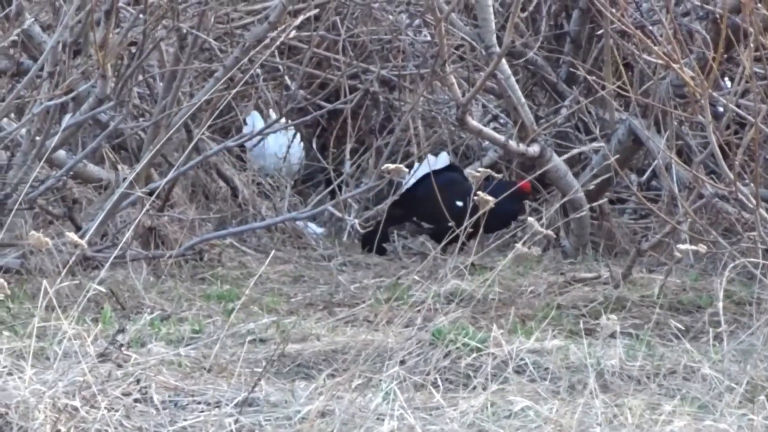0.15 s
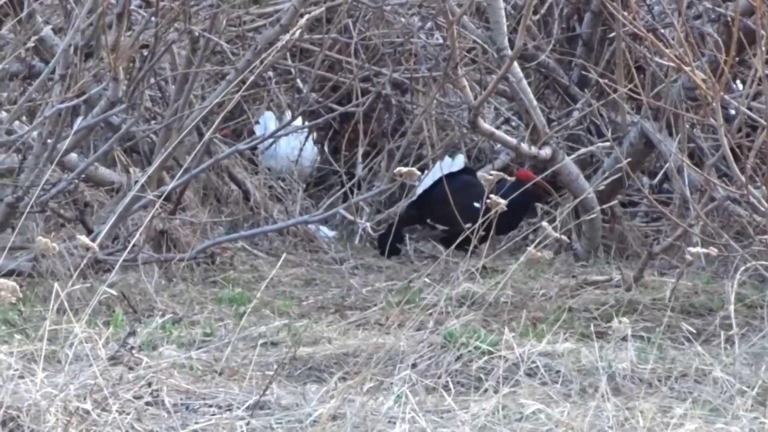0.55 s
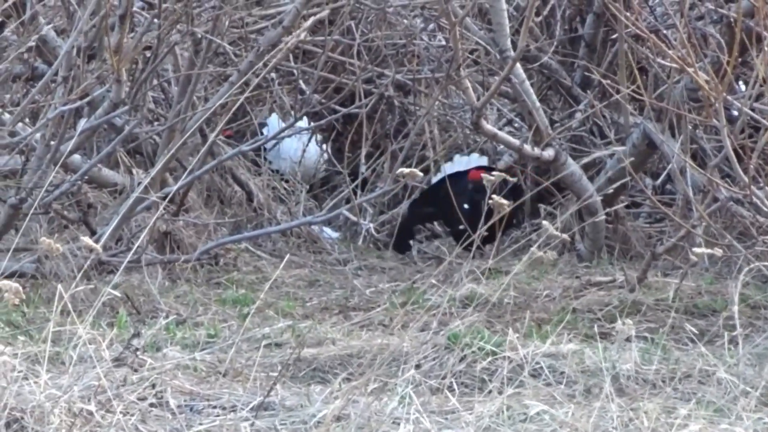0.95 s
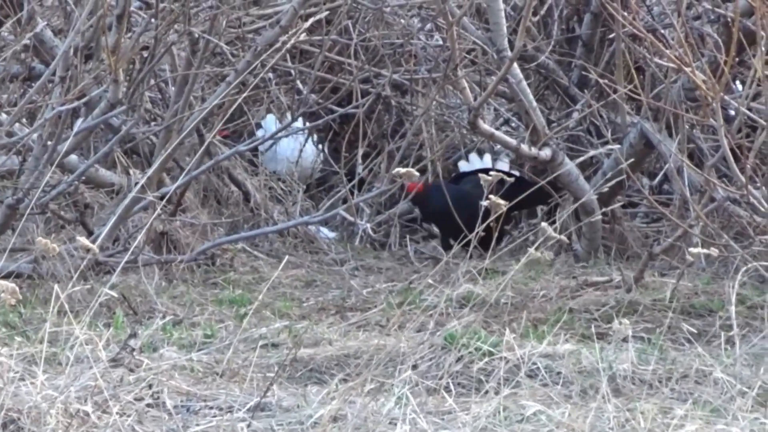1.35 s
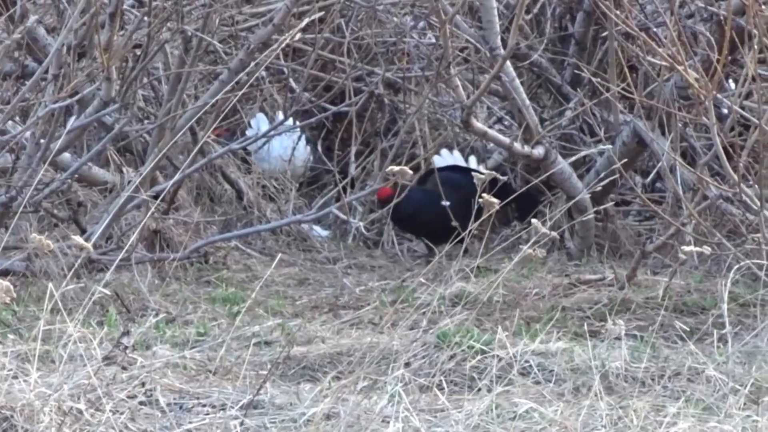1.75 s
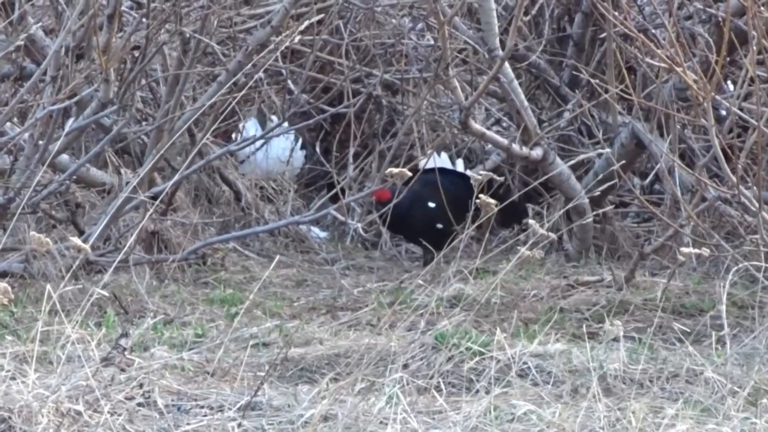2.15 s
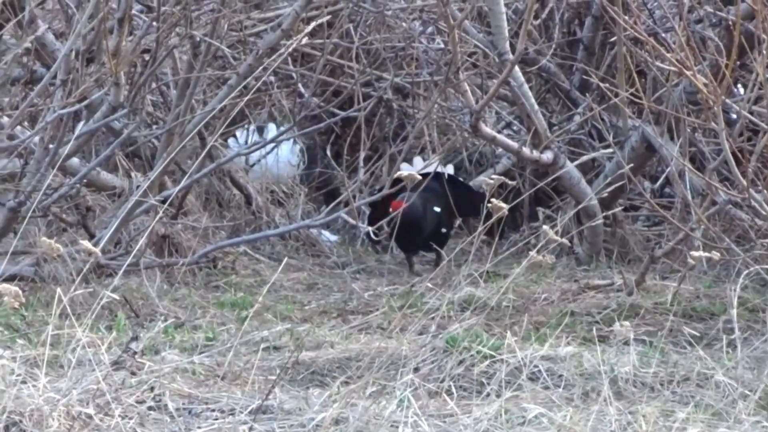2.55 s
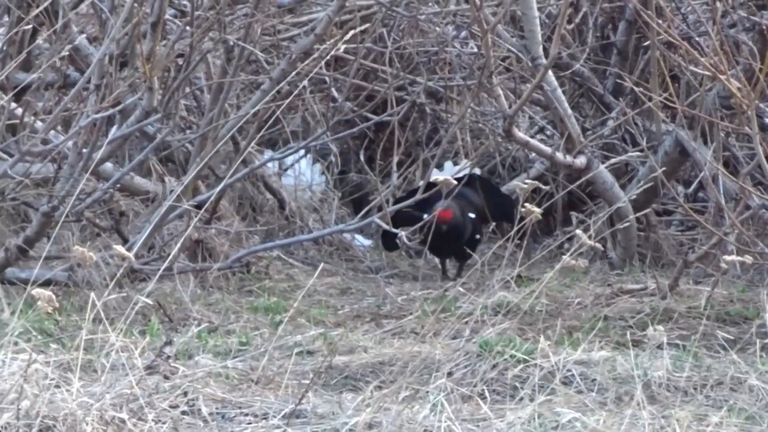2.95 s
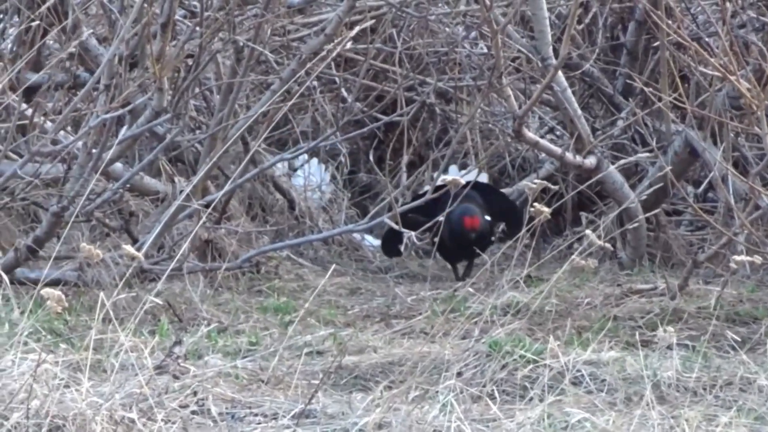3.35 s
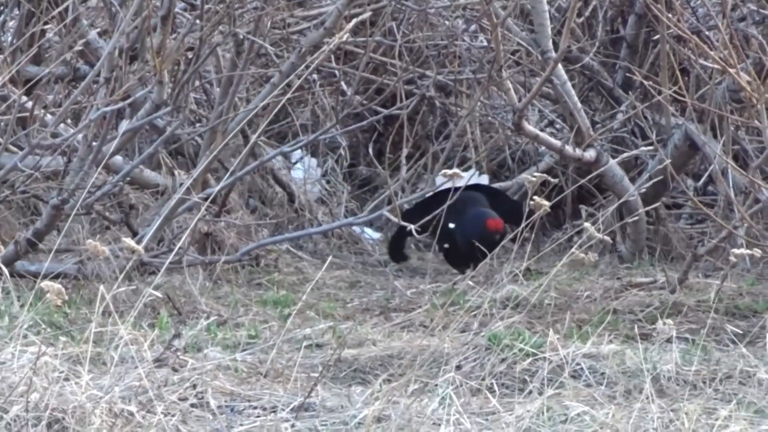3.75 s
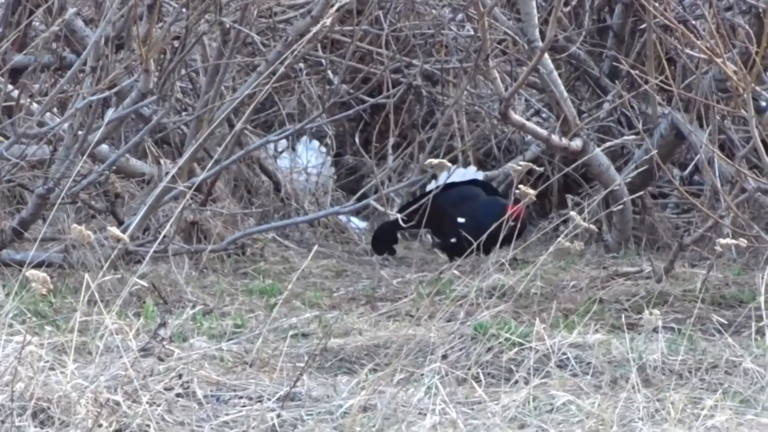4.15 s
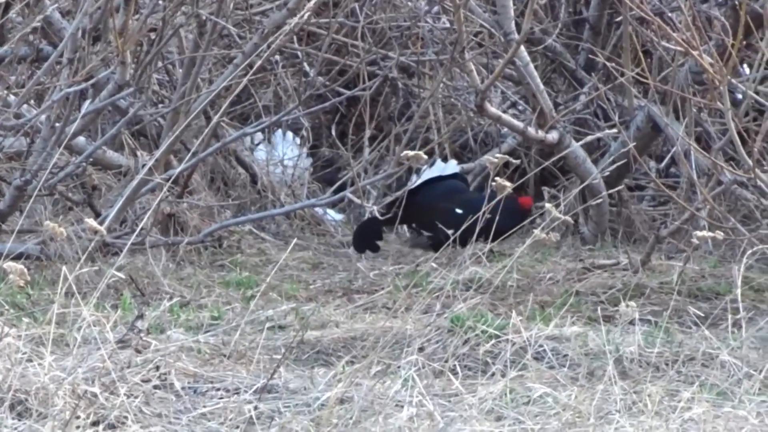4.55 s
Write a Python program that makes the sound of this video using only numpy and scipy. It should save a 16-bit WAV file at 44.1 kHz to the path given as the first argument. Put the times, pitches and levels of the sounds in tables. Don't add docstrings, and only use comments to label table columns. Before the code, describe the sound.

Uneven wind thumps and deep jolts underlie a soft bubbling grouse song, quick songbird warbling, sagging whistles and faint distant chirps.

```python
import sys
import numpy as np
from scipy import signal
from scipy.fft import rfft, irfft, next_fast_len
from scipy.io import wavfile
from scipy.ndimage import map_coordinates

SR = 44100
rng = np.random.default_rng(int(sys.argv[2]) if len(sys.argv) > 2 else 0)


def wav_out(sig):
    wavfile.write(sys.argv[1], SR, np.round(np.clip(np.atleast_2d(sig).T, -1, 1) * 32767).astype(np.int16))


def elevation(decibels):
    levels = np.asarray(decibels, float)
    return 10 ** (levels / 20)


N = 207925

# centre_s, peak_db, pitch_hz, half_length_ms
OPENING_BUBBLES = [(.764, -40.5, 396, 9.9), (.844, -32.5, 418, 5.4), (.919, -31, 420, 8.4),
                   (.969, -37, 389, 10), (.998, -27.5, 437, 8.5), (1.051, -33.5, 388, 11),
                   (1.065, -33, 464, 14), (1.083, -20.5, 443, 4.7), (1.128, -33, 402, 10),
                   (1.138, -33.5, 487, 13), (1.168, -21, 457, 5), (1.22, -26, 452.3, 9.1),
                   (1.24, -30.5, 490, 10)]
# centre_s, peak_db, pitch_hz, half_length_ms
ROLLING_BUBBLES = [(1.548, -31, 503, 5.7), (1.575, -33, 498, 17), (1.585, -23.5, 460, 6.2),
                   (1.66, -27.5, 505, 5.9), (1.69, -26.5, 475, 12.3), (1.755, -36.5, 450, 12),
                   (1.805, -36, 481, 19), (1.821, -29.5, 459, 17), (1.853, -32.5, 432, 7),
                   (1.894, -23.5, 430, 5.6), (1.942, -27.5, 422, 10.7), (1.976, -30, 400, 10),
                   (1.996, -29, 492, 16.3), (2.084, -35.5, 475, 18), (2.101, -22, 437, 5.5)]
# centre_s, peak_db, pitch_hz, half_length_ms
CLOSING_BUBBLES = [(2.22, -29, 438, 13), (2.257, -29, 490, 7.5), (2.27, -28.5, 431, 7.2),
                   (2.294, -28, 422, 10.4), (2.327, -31.5, 452, 21), (2.41, -30.5, 475, 8.9),
                   (2.465, -28.5, 460, 4.3), (2.49, -30, 462, 16), (2.499, -28.5, 517, 11),
                   (2.533, -32, 438, 17), (2.548, -24.5, 488, 11.5), (2.588, -31, 471, 23),
                   (2.605, -27.5, 440, 9.5), (2.654, -34, 460, 4.1), (2.68, -20.5, 442, 8.4),
                   (2.744, -37, 462, 13), (2.894, -30.5, 432, 5)]
# time_s, peak_db, pitch_hz
MUTTER = [
    (.5, -46, 390),
    (.75, -43.5, 387),
    (1.0, -43, 427),
    (1.35, -42.5, 470),
    (1.6, -40.5, 437),
    (2.1, -38, 450),
    (2.6, -40, 470),
    (2.9, -40, 447),
    (3.05, -48, 430),
]

# start_s, length_ms, start_hz, end_hz, peak_db
WARBLE_FALLS = [(1.332, 42, 3160, 3280, -53), (1.395, 24.4, 3780, 3400, -45.5),
                (1.703, 13, 3940, 2900, -49), (1.729, 32.3, 4720, 2650, -33.5),
                (1.846, 21, 3500, 2980, -45), (1.889, 11, 4380, 3830, -35), (1.897, 23, 3846, 3420, -31.5),
                (1.920, 39, 3130, 2654, -38), (1.960, 38.7, 4300, 2376, -35.5),
                (2.064, 25, 4160, 3080, -41.5), (2.086, 24.3, 4230, 3387, -31),
                (2.108, 12, 3320, 2870, -38), (2.216, 23, 3790, 3010, -40), (2.266, 18, 4480, 3840, -32.5),
                (2.280, 18.5, 4210, 3020, -34), (2.344, 23, 4200, 2840, -35),
                (2.419, 16.4, 4384, 3750, -35.5), (2.448, 12.2, 3530, 2990, -37.5),
                (2.458, 17, 3040, 2930, -41.5)]
# start_s, start_hz, end_hz, peak_db
WARBLE_FLICKS = [
    (1.385, 3330, 4300, -49),
    (1.883, 3400, 4300, -40),
    (1.952, 3100, 3770, -41),
    (1.985, 2940, 3600, -42),
    (2.237, 3770, 4270, -39),
    (2.252, 3060, 4600, -37),
    (2.299, 3460, 4030, -35),
    (2.478, 3430, 3760, -40),
]
# start_s, pitch_hz, peak_db
WARBLE_PIPS = [(1.718, 4460, -35.5), (1.835, 3950, -48), (1.868, 4110, -41), (2.039, 3320, -45),
               (2.195, 3950, -47), (2.205, 3220, -49), (2.305, 2840, -40), (2.325, 4050, -31),
               (2.368, 3870, -51), (2.432, 3656, -33.5), (2.55, 3080, -49)]
# start_s, length_ms, start_hz, peak_db
SAGGING_WHISTLES = [(2.806, 40, 3806, -32.5), (2.924, 43, 3683, -32), (2.935, 40, 3980, -45),
                    (2.992, 55, 3595, -36), (3.140, 52, 3570, -36), (3.2, 81, 3616, -43.5),
                    (3.222, 50, 3260, -39), (3.3, 64, 3240, -53), (3.440, 51, 3290, -37),
                    (3.591, 27, 3345, -43), (3.61, 35, 3660, -52.5), (3.760, 20, 3870, -57)]
# start_s, length_ms, pitch_hz, peak_db
LEVEL_WHISTLES = [(1.160, 49, 4100, -54.5), (1.432, 21, 4000, -48.5), (1.52, 80, 3920, -63),
                  (1.55, 43, 3420, -60), (2.520, 170, 3610, -52.5), (2.515, 20, 3320, -45),
                  (2.600, 110, 3140, -49.5), (2.675, 44, 5040, -55), (2.720, 55, 3720, -63),
                  (2.862, 30, 3750, -57), (3.010, 20, 3890, -43), (3.082, 36, 3593, -31.5),
                  (3.352, 41, 3420, -40), (3.404, 22, 3830, -37), (3.340, 57, 3840, -46),
                  (3.42, 82, 3410, -47.5), (3.440, 150, 3790, -50), (3.520, 33, 3340, -43.5),
                  (3.605, 44, 3106, -44), (3.735, 22, 3315, -52.5)]
# pitch_hz, gain_db
BEAK = [(2400, -6), (3000, -5), (3600, 0), (4200, -1), (5000, -6)]
# delay_ms, gain_db
BRANCHES = [
    (2.1, -9),
    (4.7, -8),
    (8.3, -9),
]
# start_s, length_ms, start_hz, end_hz, peak_db
BUZZ = [
    (2.975, 20, 3770, 4280, -48),
    (3.03, 53, 4230, 3800, -50),
    (3.122, 43, 3930, 4230, -53),
    (3.495, 17, 4160, 4050, -51),
    (3.53, 53, 4220, 3920, -55),
]
# start_s, length_ms, start_hz, end_hz, peak_db
FAR_BIRDS = [(.175, 107, 3490, 2865, -56.5), (.310, 24, 3100, 3110, -56.5), (.420, 85, 3260, 2870, -63),
             (.580, 16, 2800, 2600, -58), (.697, 16, 3040, 3150, -53), (.714, 14, 3060, 2350, -59),
             (.836, 14, 2780, 2765, -52), (.910, 21, 2700, 2600, -58), (1.105, 28.7, 2760, 2820, -60),
             (4.168, 18, 3100, 2940, -57), (4.245, 19, 3600, 3320, -54), (4.335, 25, 3640, 3590, -59),
             (4.518, 15, 3300, 3300, -57), (4.545, 100, 1326, 1330, -52.5), (4.660, 40, 1280, 1250, -58)]

# time_s, level_db
GUSTS = [(0.0, -30), (0.24, -29), (0.5, -35.5), (0.6, -30), (0.94, -35.5), (1.06, -30), (1.25, -28.5),
         (1.74, -29.5), (1.85, -25), (1.95, -35.5), (2.66, -31), (3.2, -32.5), (3.41, -29.5), (3.47, -32),
         (3.93, -31.5), (4.13, -32), (4.24, -27), (4.6, -28.5)]
# frequency_hz, level_db per Hz
LEFT_PORT = [(2, -12), (8, 1), (18, 4), (35, -3), (50, -9), (70, -18), (120, -28.5), (300, -50),
             (1500, -120)]
RIGHT_PORT = [(2, 1), (6, 1.5), (10, 8.5), (20, -1), (35, -3.5), (50, -15), (70, -22.5), (120, -29.5),
              (300, -53), (1500, -120)]
# frequency_hz, opposed_share
PUSH_PULL = [(8, 0), (22, .65), (50, .55), (150, .2)]
# time_s, peak_db
JOLTS = [
    (.260, -6.5),
    (3.329, -5.5),
]
# time_s, peak_db, half_length_ms
POP = (1.838, -13.5, 4.7)
# time_s, peak_db, centre_hz
STEMS = [
    (2.516, -42.5, 6050),
    (3.849, -47, 13500),
    (3.927, -45, 13500),
    (4.525, -43, 2600),
]
# frequency_hz, level_db per Hz
AIR = [(35, -51), (60, -3), (163, -3.5), (272, -8), (376, -7.5), (642, -15.5), (705, -17), (1200, -22.5),
       (1420, -23.5), (2420, -28.5), (3590, -30), (3940, -32.5), (15500, -35)]
# frequency_hz, correlation
AIR_LIKENESS = [(60, -.3), (120, -.1), (250, .2), (500, .25), (1000, .06), (4000, 0)]
# frequency_hz, balance_db
AIR_TILT = [(60, -4), (250, -2.5), (1000, -3), (10000, -3.5)]
# pitch_hz, rms_db
MOTOR = [(689, -57.5)]


def unit(x):
    return x / np.sqrt(np.mean(x ** 2, axis=-1, keepdims=True) + 1e-20)


def along(points, hz):
    f, v = np.transpose(points)
    return np.interp(np.log(hz + 1), np.log(f + 1), v)


def wobble(rate):
    knots = rng.standard_normal(int(N * rate / SR) + 4)
    return map_coordinates(knots, [np.arange(N) * rate / SR])


def filtered(x, response):
    m = next_fast_len(N + 8192)
    return irfft(rfft(x, m) * response(np.fft.rfftfreq(m, 1 / SR)), m)[..., :N]


def add(track, s, sound):
    part = track[..., round(s * SR):][..., :sound.shape[-1]]
    part += sound[..., :part.shape[-1]]


def panned(balance_db):
    return elevation([[balance_db / 2], [-balance_db / 2]])


def echoes(x, t60, delay, shared):
    t = np.arange(SR // 2) / SR
    wet, hop = np.zeros((2, N)), 1024
    fade = np.hanning(2 * hop + 1)[:-1]
    decay = elevation(-60 * t / t60) * (t > delay)
    for k in range(0, N - 2 * hop, hop):
        piece = x[k:k + 2 * hop]
        if not piece.any():
            continue
        common, left, right = rng.standard_normal((3, len(t)))
        tail = np.sqrt(shared) * common + np.sqrt(1 - shared) * np.array([left, right])
        tail = tail * decay
        tail = tail / np.linalg.norm(tail[0])
        add(wet, k / SR, signal.fftconvolve((piece * fade)[None], tail, axes=1))
    return wet


def mutter():
    s, db, hz = np.transpose(MUTTER)
    gap_s, half_length_ms, pitch_spread = .06, 10, .065
    beats = np.arange(s[0], s[-1], gap_s)
    late, bend = rng.standard_normal((2, len(beats)))
    at = beats + .3 * gap_s * late
    return [(a, np.interp(a, s, db), np.interp(a, s, hz) * (1 + pitch_spread * b), half_length_ms, 0)
            for a, b in zip(at, bend)]


def grouse():
    out, t = np.zeros((2, N)), np.arange(-2600, 2600) / SR
    parts = [(OPENING_BUBBLES, -1500), (ROLLING_BUBBLES, 1360), (CLOSING_BUBBLES, 640)]
    bubbles = [(*row, glide) for table, glide in parts for row in table] + mutter()
    for s, db, hz, ms, glide in bubbles:
        start_turn, head = rng.random(2)
        pan_db = 3 + 1.5 * (2 * head - 1)
        phase = 2 * np.pi * (hz * t + glide * t * t / 2 + start_turn)
        swell = elevation(db) * np.exp(-.5 * (1000 * t / ms) ** 2)
        add(out, s + t[0], panned(pan_db) * swell * np.sin(phase))
    return out + elevation(-8) * echoes(out.mean(0), t60=.35, delay=.012, shared=.6)


def songbird(notes, beak, edge, flutter_db, quaver_hz, pan_db, wet_db, t60):
    dry, quaver = np.zeros(N), quaver_hz * wobble(150)
    for s, ms, start_hz, mid_hz, end_hz, db in notes:
        u = np.linspace(-1, 1, max(int(ms * SR / 1000), 8))
        slope = (end_hz - start_hz) / 2
        bow = (end_hz + start_hz) / 2 - mid_hz
        hz = mid_hz + slope * u + bow * u * u
        hz = hz + np.resize(quaver[round(s * SR):], len(u))
        swell = elevation(db + along(beak, hz)) * (1 - u * u) ** edge
        add(dry, s, swell * np.sin(2 * np.pi * np.cumsum(hz) / SR))
    dry = dry * elevation(flutter_db * wobble(90))
    wet = echoes(dry, t60, delay=.0091, shared=.75)
    return (dry + elevation(wet_db) * wet) * panned(pan_db)


def slides(rows):
    return [(s, ms, a, (a + b) / 2, b, db) for s, ms, a, b, db in rows]


def among_branches(song):
    def comb(hz):
        return 1 + sum(elevation(db) * np.exp(-2j * np.pi * hz * ms / 1000) for ms, db in BRANCHES)
    return filtered(song, comb)


def warble():
    # 10.3 ms at least, then 1 ms for each 220 Hz
    flicks = [(s, 10.3 + (b - a) / 220, a, b, db) for s, a, b, db in WARBLE_FLICKS]
    pips = [(s, 17, hz, hz, db) for s, hz, db in WARBLE_PIPS]
    notes = slides(list(WARBLE_FALLS) + flicks + pips)
    song = songbird(notes, BEAK, edge=.53, flutter_db=4, quaver_hz=72, pan_db=-3.5, wet_db=-3.5, t60=.72)
    return elevation(-.5) * among_branches(song)


def whistles():
    sag_hz_per_ms, sag_by_middle = 3.65, .583
    notes = slides([(s, ms, hz, hz, db) for s, ms, hz, db in LEVEL_WHISTLES])
    for s, ms, hz, db in SAGGING_WHISTLES:
        sag_hz = sag_hz_per_ms * ms
        notes.append((s, ms, hz, hz - sag_by_middle * sag_hz, hz - sag_hz, db))
    return songbird(notes, BEAK, edge=.24, flutter_db=1.5, quaver_hz=38, pan_db=-3, wet_db=-4, t60=.71)


def buzzy_singer():
    return elevation(-2.5) * songbird(slides(BUZZ), BEAK, edge=.5, flutter_db=4, quaver_hz=110,
                                pan_db=-2, wet_db=1, t60=.4)


def far_birds():
    return songbird(slides(FAR_BIRDS), [(3000, 0)], edge=.68, flutter_db=3.5, quaver_hz=40,
                    pan_db=-2, wet_db=-1.5, t60=.78)


def buffet():
    def opposed(hz):
        return np.clip(along(PUSH_PULL, hz), 0, .95)

    left, other = rng.standard_normal((2, N))
    right = filtered(other, lambda hz: np.sqrt(1 - opposed(hz) ** 2)) - filtered(left, opposed)
    noise = filtered(np.array([left, right]), lambda hz: elevation([along(LEFT_PORT, hz), along(RIGHT_PORT, hz)]))
    s, db = np.transpose(GUSTS)
    gust_db = np.interp(np.arange(N) / SR, s, db) + 10
    lumpy_db = 2.3 * wobble(8)
    return elevation(gust_db + lumpy_db) * noise / np.sqrt(np.mean(noise ** 2))


def jolts():
    t = np.arange(N) / SR

    def lobe(s, db, width_s):
        return elevation(db) * np.exp(-.5 * ((t - s) / width_s) ** 2)

    out = np.zeros(N)
    for s, db in JOLTS:
        out += lobe(s + .072, db + 2.5, .02)
        out -= lobe(s, db, .011)
        out -= lobe(s + .18, db - 9, .042)
    return out


def pop():
    s, db, ms = POP
    u = (np.arange(N) / SR - s) * 1000 / ms
    return elevation(db) * (1 - u * u) * np.exp(-.5 * u * u) * np.array([[1], [0]])


def capsules():
    swing = buffet() + jolts() + pop()
    travel = .64
    return swing / (1 + np.abs(swing / travel) ** 10) ** (1 / 10)


def stems():
    out, t = np.zeros((2, N)), np.arange(SR // 50) / SR
    for s, db, hz in STEMS:
        band = signal.butter(2, [hz * .8, hz * 1.2], "band", fs=SR)
        burst = unit(signal.lfilter(*band, rng.standard_normal((2, len(t)))))
        add(out, s, elevation(db - 60 * t / .014) * burst)
    return out


def air():
    def mid_side(hz):
        angle = np.arccos(np.clip(along(AIR_LIKENESS, hz), -1, 1)) / 2
        return elevation(along(AIR, hz)) * [np.cos(angle), np.sin(angle)]

    mid, side = filtered(rng.standard_normal((2, N)), mid_side)
    pair = np.array([mid + side, mid - side])
    pair = filtered(pair, lambda hz: elevation([[.5], [-.5]] * along(AIR_TILT, hz)))
    return elevation(-40.5) * unit(pair)


def motor():
    t, out = np.arange(N) / SR, np.zeros(N)
    for hz, db in MOTOR:
        level = elevation(db + 1.5 + 1.7 * wobble(5.98))
        out += level * np.sin(2 * np.pi * hz * t + .57 * wobble(4.1))
    return out


def scene():
    birds = grouse() + warble() + whistles() + buzzy_singer() + far_birds()
    return birds + capsules() + stems() + air() + motor()


def low_pass(x):
    return signal.sosfilt(signal.butter(12, 15790, fs=SR, output="sos"), x)


def record(dry):
    offset = -.016
    return low_pass(dry + offset)


dry = scene()
out = record(dry)
wav_out(out)
```